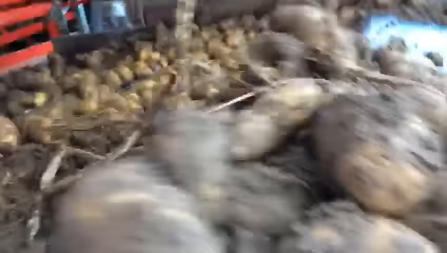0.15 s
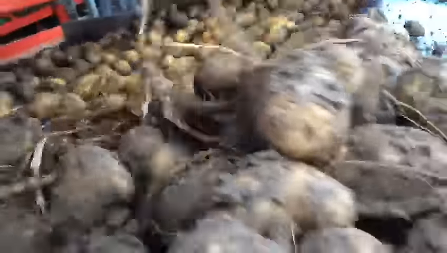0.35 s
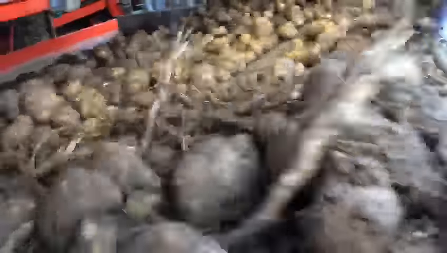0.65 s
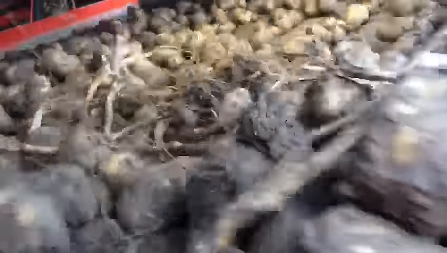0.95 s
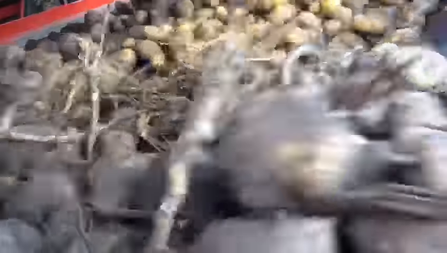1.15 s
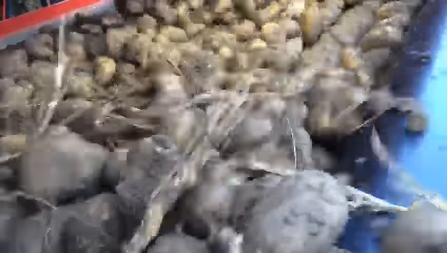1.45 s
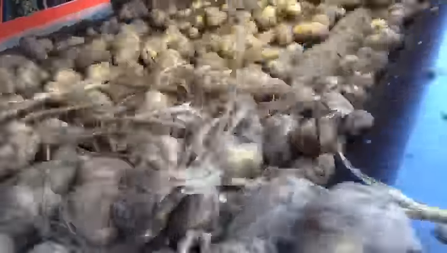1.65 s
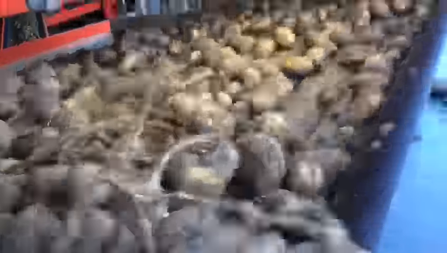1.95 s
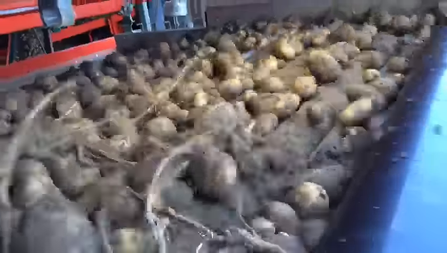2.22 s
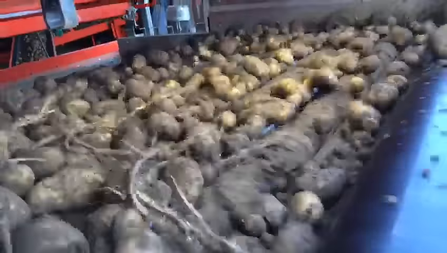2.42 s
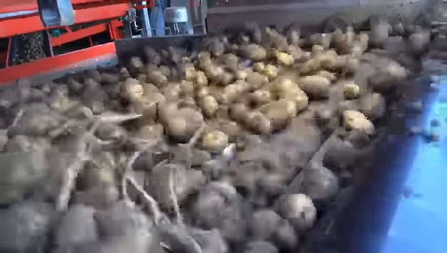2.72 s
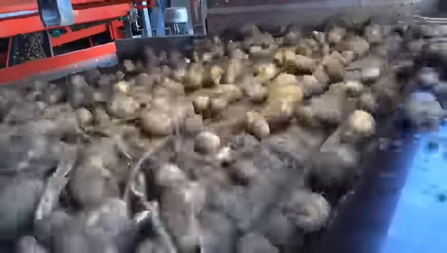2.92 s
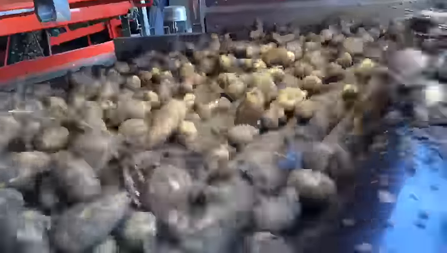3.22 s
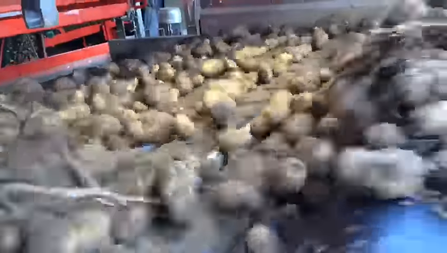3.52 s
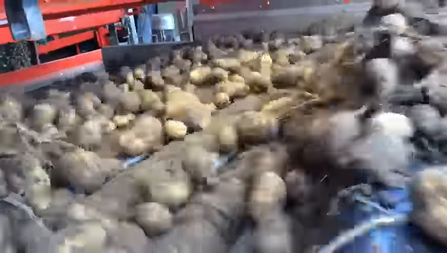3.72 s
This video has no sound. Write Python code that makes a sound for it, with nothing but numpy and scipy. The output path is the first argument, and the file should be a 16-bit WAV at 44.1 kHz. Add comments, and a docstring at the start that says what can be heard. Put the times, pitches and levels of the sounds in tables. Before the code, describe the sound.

Close to a farm grader, a steady low roar and belt clatter carry irregular potato thuds. Grit ticks and brief steel scrapes come and go, then a hard clang; the rough microphone dulls the extreme treble.

```python
"""Beside a potato grading machine, heard from close by. The frame roars: shaped noise and random contacts.
Potatoes thud and clack as damped sines. Dragged stones slip on a steel panel, ringing its resonances
and rasping; stones knock a guard, sounding its modes with a noise crack. Grit ticks as bright noise
bursts, and the drive whines faintly in the treble as drifting sines."""
import sys
import numpy as np
from scipy import signal
from scipy.fft import rfft, irfft, next_fast_len
from scipy.io import wavfile
from scipy.ndimage import uniform_filter1d, map_coordinates

SR = 44100
rng = np.random.default_rng(int(sys.argv[2]) if len(sys.argv) > 2 else 0)


def wav_out(sig):
    """Save sig, one row per channel (or a flat mono array), as 16-bit PCM at SR to the path in sys.argv[1]."""
    wavfile.write(sys.argv[1], SR, np.round(np.clip(np.atleast_2d(sig).T, -1, 1) * 32767).astype(np.int16))


def level_to_linear(level):
    """Convert decibel levels to linear amplitude factors, elementwise."""
    exponent = np.asarray(level, float) / 20
    return 10 ** exponent


N = 170667

# drive whine: (frequency [Hz], rms level at each of WHINE_TIMES_S [dB] x 5)
WHINE_TONES = [(5604, -53, -54, -64, -58, -56), (5809, -62, -63, -65, -65, -64),
               (6002, -64, -63, -61, -61, -63), (6395, -53, -61, -59, -63, -68),
               (6794, -66, -67, -67, -67, -68), (7569, -57, -56, -57, -57, -58),
               (8312, -66, -67, -69, -69, -68), (8506, -71, -70, -69, -69, -70)]
# times of the whine levels: (time [s])
WHINE_TIMES_S = [0, 1.3, 1.5, 2.6, 3.9]
# machine loudness before trims: (time [s], rumble [dB], clatter [dB], hiss [dB])
MACHINE_LEVELS = [(0.0, -18.5, -28, -39.5), (0.16, -24, -26.5, -42.5), (0.35, -21.5, -28, -39),
                  (0.61, -19, -26, -39.5), (0.85, -21, -27.5, -42), (1.13, -20.5, -26, -41.5),
                  (1.43, -21.5, -27, -41.5), (2.1, -23, -27, -41.5), (2.38, -21.5, -25, -41),
                  (2.66, -23.5, -24.5, -40), (2.89, -22.5, -26, -41), (3.24, -22, -27.5, -40.5),
                  (3.52, -22, -25.5, -41), (3.87, -22.5, -27.5, -41.5)]
# rumble spectrum, relative: (frequency [Hz], density [dB per Hz])
RUMBLE_SPECTRUM = [(13, -49), (22, -39), (59, -5), (102, -6.5), (151, -3), (204, -3.5), (258, -6),
                   (387, -9), (460, -14), (700, -25), (910, -74), (1540, -120)]
# frame resonances on the rumble: (centre [Hz], width [Hz], lift [dB])
FRAME_RESONANCES = [(144.8, 17.3, 6), (203.5, 16, 3.5), (462.5, 5.5, 7.5), (497, 9.1, -4), (520, 26, 5)]
# belt clatter spectrum, relative: (frequency [Hz], density [dB per Hz])
CLATTER_SPECTRUM = [(240, -3), (400, -18), (452, -2), (720, -6.5), (1230, -12.5), (1380, -13),
                    (1480, -15.5), (2330, -17.5), (4500, -31.5), (5850, -48), (9900, -120)]
# soil hiss spectrum, relative: (frequency [Hz], density [dB per Hz])
HISS_SPECTRUM = [(2060, -6.5), (3500, -0.5), (5340, -4), (5790, -3.5), (7090, -6), (7820, -6.5),
                 (10100, -12.5), (10800, -20), (14000, -52), (22000, -120)]
# grit flung on metal: (time [s], level [dB], t60 [s], tilt [dB per octave])
GRIT_TICKS = [(.144, -39, .035, -6), (.418, -40, .05, 0), (.5, -38, .05, -5), (.526, -39, .045, -6),
              (1.353, -32.5, .045, -5), (1.375, -44, .03, -6), (1.539, -35.5, .03, -1),
              (1.663, -40.5, .03, -2), (2.26, -33.5, .09, -4), (2.39, -39, .04, -6), (2.649, -38, .05, -5),
              (2.78, -39, .04, -4)]
# grit spectrum before tilt, relative: (frequency [Hz], density [dB per Hz])
GRIT_SPECTRUM = [(900, -22), (2000, -7), (4500, -2), (7000, 0), (10000, -2), (12000, -10)]
# strokes of stone on steel: (start [s], length [s], ring level [dB], rasp level [dB])
SCRAPE_STROKES = [(.49, 0.041, -45, -33.5), (.657, 0.051, -32, -36), (.718, 0.039, -32, -37),
                  (.755, 0.014, -45, -37), (.88, 0.033, -45, -35), (1.78, 0.045, -43, -35),
                  (1.66, 0.077, -41.5, -33.5), (1.862, 0.013, -43, -28.5), (2.11, 0.14, -57, -33),
                  (2.35, 0.12, -33.5, -34), (2.488, 0.094, -31, -33), (2.585, 0.054, -33.5, -28.5),
                  (2.655, 0.038, -39, -34), (2.772, 0.066, -30, -29), (2.84, 0.052, -38, -34),
                  (3.04, 0.062, -55, -32), (3.12, 0.078, -44, -34.5), (3.395, 0.051, -42, -29),
                  (3.436, 0.069, -33, -41), (3.55, 0.032, -40, -30.5)]
# steel panel resonances: (centre [Hz], width [Hz], relative level [dB])
PANEL_RESONANCES = [(915, 48, -8), (1560, 41, -8), (1960, 89, -13), (2370, 60, 0), (2470, 50, -5),
                    (2840, 60, -7), (3110, 37, -12), (3730, 41, -13)]
# rasp spectrum, relative: (frequency [Hz], density [dB per Hz])
RASP_SPECTRUM = [(300, -5), (700, -7), (1500, -1.5), (2600, -15.5), (3500, -13.5), (5000, -22), (9000, -47)]
# stones knocking the guard: (time [s], relative level [dB], treble tilt [dB per octave])
GUARD_KNOCKS = [(2.894, -11.5, -10), (2.936, -19, -7), (3.278, -17, -2), (3.682, -27, 2),
                (3.6925, -1, -1.5), (3.7035, -8, 1.5), (3.718, -24, 2)]
# guard modes: (frequency [Hz], relative level [dB], t60 [s])
GUARD_MODES = [(775, -10, .13), (1020, 1.5, .06), (1125, 0, .055), (1340, -3, .07), (1895, -9, .2),
               (2110, -5, .06), (2460, -3, .07), (2789, -12, .08), (2972, -9, .2), (3386, -19, .12),
               (4070, -20, .12), (4323, -23, .16), (5340, -17, .08), (6207, -22, .09)]
# crack spectrum, relative: (frequency [Hz], density [dB per Hz])
CRACK_SPECTRUM = [(400, -26), (1000, -4.5), (2500, 2), (4000, -9.5), (6700, -10.5), (10800, -28)]
# heavy potatoes landing: (time [s], level before trim [dB], pitch [Hz], ring to -20 dB [cycles])
POTATO_THUDS = [(.068, -1.5, 156.5, 3.5), (.25, -3.5, 166, 3), (.509, -2.5, 195, 3.5),
                (.877, -10, 198, 11.5), (.885, -8.5, 71, 5.5), (.982, -9, 178, 3), (1.098, -12.5, 217, 16),
                (1.19, -8.5, 67.6, 4), (1.288, -11.5, 190, 10), (1.717, -5.5, 180, 3), (1.784, -11, 173, 2),
                (1.942, -7, 144, 3.5), (2.305, -11, 194, 4), (2.344, -3, 160, 3), (2.377, -5.5, 195, 6),
                (2.487, -5, 85, 2), (3.222, -3, 148, 2), (3.444, -5.5, 161, 5.5)]
# potatoes clacking together: (time [s], level [dB], pitch [Hz])
POTATO_CLACKS = [(.342, -10, 1000), (.385, -15, 450), (.502, -11, 600), (.527, -15, 500), (.67, -15, 1660),
                 (.719, -15, 2750), (.799, -14, 400), (.808, -14, 350), (.914, -12, 455), (1.16, -14, 500),
                 (1.80, -19, 1300), (1.869, -17, 1000), (2.218, -16, 1240), (2.378, -16, 1570),
                 (2.411, -13, 1780), (2.491, -14, 1390), (2.507, -15, 1890), (2.538, -15, 930),
                 (2.565, -15, 1840), (2.592, -13, 930), (2.618, -13, 1330), (2.732, -16, 2000),
                 (2.784, -15, 1800), (2.801, -12, 1070), (2.828, -13, 1900), (2.847, -15, 1210),
                 (2.876, -14, 1720), (3.054, -16, 1380), (3.131, -16, 1400), (3.412, -13, 1100),
                 (3.56, -14, 1070)]


def unit(x):
    """Scale to rms 1."""
    return x / np.sqrt(np.mean(x ** 2) + 1e-20)


def along(points, hz):
    """Interpolate (Hz, value) points on a log frequency axis."""
    f, v = np.transpose(points)
    return np.interp(np.log(hz + 1), np.log(f + 1), v)


def wobble(knots_per_s):
    """Smooth random curve: a spline through Gaussian knots."""
    return map_coordinates(rng.standard_normal(200), [np.arange(N) * knots_per_s / SR])


def filtered(x, response):
    """Multiply the spectrum of x by a response of frequency."""
    m = next_fast_len(N + SR // 2)
    return irfft(rfft(x, m) * response(np.fft.rfftfreq(m, 1 / SR)), m)[:N]


def shaped(x, spectrum):
    """Filter x by a dB spectrum, then scale to rms 1."""
    return unit(filtered(x, lambda hz: level_to_linear(along(spectrum, hz))))


def rush(patchy_db):
    """White noise with random gain patches in time and frequency."""
    z = signal.stft(rng.standard_normal(N), nperseg=1024)[2]
    field = uniform_filter1d(rng.standard_normal(z.shape), size=6, axis=0)
    field = uniform_filter1d(field, size=5, axis=1)
    return unit(signal.istft(z * level_to_linear(patchy_db * unit(field)), nperseg=1024)[1][:N])


def impacts(per_s, spread_db):
    """Random contacts of either sign, a few much stronger than the rest."""
    chance, side, strength = rng.random((3, N))
    gain = level_to_linear(-spread_db * np.log(strength + .03))
    return unit((chance < per_s / SR) * np.sign(side - .5) * gain)


def blend(a, b, share):
    """Mix a and b by power; share is that of b."""
    return np.sqrt(1 - share) * a + np.sqrt(share) * b


def place(events, sound):
    """Sum sound(t, *columns) at each event's time."""
    out, t = np.zeros(N + SR), np.arange(SR // 3) / SR
    for s, *cols in events:
        out[round(s * SR):][:len(t)] += sound(t, *cols)
    return out[:N]


def thump(t, db, hz, cycles, rise_per_cycle):
    """Damped sine, down 20 dB after the given cycles."""
    decay = level_to_linear(db - 20 * t * hz / cycles)
    return decay * (1 - np.exp(-t * hz * rise_per_cycle)) * np.sin(2 * np.pi * hz * t)


def whine():
    """Drive tones that drift together in pitch and flutter apart in level."""
    waver_hz, flutter_db = 1, 1
    t = np.arange(N) / SR
    drift_cycles = np.cumsum(waver_hz * wobble(13)) / SR
    out = np.zeros(N)
    for hz, *levels_db in WHINE_TONES:
        level_db = np.interp(t, WHINE_TIMES_S, levels_db) + flutter_db * wobble(30)
        tone = np.sin(2 * np.pi * (hz * t + drift_cycles + rng.random()))
        out += np.sqrt(2) * level_to_linear(level_db) * tone
    return out


def machine():
    """Noise and tumbling contacts through the frame, the belt clatter and the hiss of soil."""
    tumbles_per_s, tumble_share = 260, 0.32
    rattles_per_s, rattle_share = 1500, 0.27
    s, *cols = np.transpose(MACHINE_LEVELS)
    low_db, mid_db, high_db = [np.interp(np.arange(N) / SR, s, c) for c in cols]

    def frame(hz):
        lift_db = sum(db / (1 + (2 * (hz - c) / w) ** 2) for c, w, db in FRAME_RESONANCES)
        return level_to_linear(along(RUMBLE_SPECTRUM, hz) + lift_db)

    tumbling = blend(rush(patchy_db=2.5), impacts(tumbles_per_s, spread_db=3), tumble_share)
    rattling = blend(rush(patchy_db=3), impacts(rattles_per_s, spread_db=3), rattle_share)
    rumble = unit(filtered(tumbling, frame))
    clatter = shaped(rattling, CLATTER_SPECTRUM)
    hiss = shaped(rush(patchy_db=2.5), HISS_SPECTRUM)
    shake_db = 0.54 * wobble(9)  # shared by clatter and hiss
    return (level_to_linear(low_db + 0.62 + 0.23 * wobble(7.1)) * rumble
            + level_to_linear(mid_db - 0.03 + 0.63 * shake_db) * clatter
            + level_to_linear(high_db - 1.3 + shake_db) * hiss)


def ticks():
    """Grit on metal: short bright noise bursts, each with its own tilt."""
    snap_db, snap_t60_s = 5, .015  # first contact, over the scatter that follows
    rise_s, pivot_hz = .0003, 6500

    def burst(t, db, t60_s, tilt_db):
        hz = np.fft.rfftfreq(len(t), 1 / SR) + 1
        tint = level_to_linear(along(GRIT_SPECTRUM, hz) + tilt_db * np.log2(hz / pivot_hz))
        grit = unit(irfft(rfft(rng.standard_normal(len(t))) * tint, len(t)))
        decay = level_to_linear(-60 * t / t60_s) + level_to_linear(snap_db - 60 * t / snap_t60_s)
        return level_to_linear(db) * decay * (1 - np.exp(-t / rise_s)) * grit

    return place(GRIT_TICKS, burst)


def scrapes():
    """Quick uneven slips ring the panel and rasp while a stone drags."""
    rise_s, fall_s = 0.003, 0.013
    slips_per_s, catches_per_s, catch_share = 700, 150, .5  # catches: harder snags

    def stroke(t, length_s):
        return (1 - np.exp(-t / rise_s)) * np.exp(-np.clip(t - length_s, 0, 9) / fall_s)

    def panel(hz):
        # resonances in parallel, alternating in sign
        return sum((-1) ** k * level_to_linear(db) * 1j * hz * w / (c * c - hz * hz + 1j * hz * w)
                   for k, (c, w, db) in enumerate(PANEL_RESONANCES))

    ring_gain = place(SCRAPE_STROKES, lambda t, length_s, ring_db, rasp_db: level_to_linear(ring_db) * stroke(t, length_s))
    rasp_gain = place(SCRAPE_STROKES, lambda t, length_s, ring_db, rasp_db: level_to_linear(rasp_db) * stroke(t, length_s))
    slips = impacts(slips_per_s, spread_db=2) + 0.83 * rng.standard_normal(N)
    slips += catch_share * impacts(catches_per_s, spread_db=1.5)
    ring = unit(filtered(slips, panel))
    rasp = shaped(slips, RASP_SPECTRUM)
    return level_to_linear(1.3 * wobble(40)) * (ring_gain * ring + rasp_gain * rasp)


def knocks():
    """Each blow starts the guard's modes together, neighbours in opposite senses, and cracks."""
    crack_db, crack_t60_s, rise_s = -6, 0.07, .0012
    pivot_hz = GUARD_MODES[1][0]

    def strike(t, db):
        return level_to_linear(db - 7) * (1 - np.exp(-t / rise_s))

    def ring(t, db, tilt_db):
        modes = np.zeros(len(t))
        for k, (hz, level_db, t60_s) in enumerate(GUARD_MODES):
            mode_db = level_db + tilt_db * np.log2(hz / pivot_hz) + rng.normal(0, 1)
            tone = np.sin(2 * np.pi * hz * t + rng.normal(0, 0.69))
            modes += (-1) ** k * level_to_linear(mode_db - 60 * t / t60_s) * tone
        return strike(t, db) * modes

    def crack(t, db, tilt_db):
        return strike(t, db) * level_to_linear(crack_db + tilt_db - 60 * t / crack_t60_s)

    noise = shaped(rng.standard_normal(N), CRACK_SPECTRUM)
    return place(GUARD_KNOCKS, ring) + place(GUARD_KNOCKS, crack) * noise


def thuds():
    """Soft low blows and the drier clacks of potato on potato, as damped sines."""
    trim_db, clack_cycles = 1, 1.6

    def thud(t, db, hz, cycles):
        return thump(t, db + trim_db, hz, cycles, rise_per_cycle=1.3)

    def clack(t, db, hz):
        return thump(t, db, hz, clack_cycles, rise_per_cycle=11)

    return place(POTATO_THUDS, thud) + place(POTATO_CLACKS, clack)


def scene():
    """All sources at one microphone."""
    return (whine() + machine() + ticks() + scrapes() + knocks() + thuds())[None]


def top_cut(x):
    """Nothing passes above the cut-off."""
    return signal.sosfilt(signal.butter(12, 10920, fs=SR, output="sos"), x)


def record(dry):
    """The camera rounds off the tallest peaks, then cuts the deep bass and the top."""
    ceiling, low_cut_hz, high_cut_hz = .98, 32, 10650

    def band(hz):
        return 1 / (1 + (hz / high_cut_hz) ** 120) / (1 + (low_cut_hz / (hz + 1)) ** 4)

    soft = dry[0] / (1 + np.abs(dry[0] / ceiling) ** 5) ** (1 / 5)
    mix = filtered(soft, band)[None]
    return top_cut(mix)


dry = scene()
out = record(dry)
wav_out(out)
```